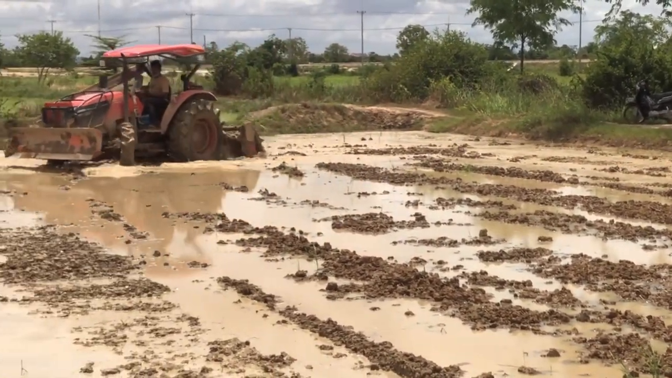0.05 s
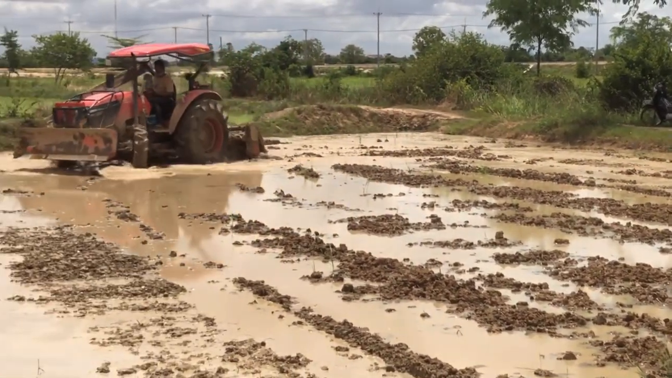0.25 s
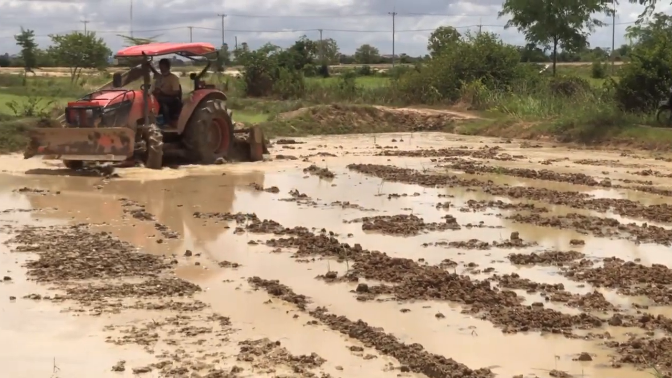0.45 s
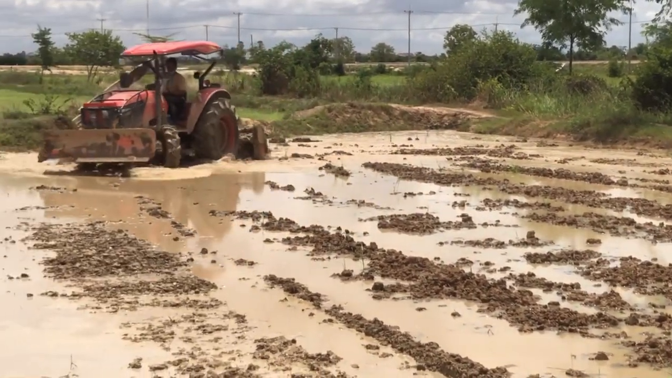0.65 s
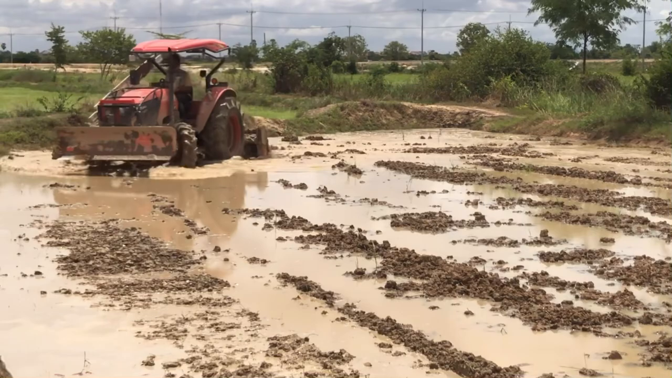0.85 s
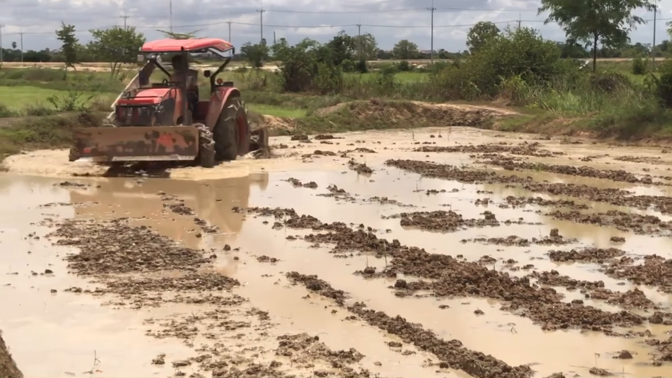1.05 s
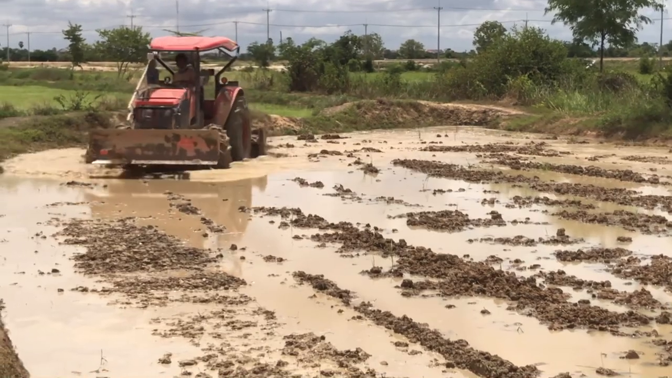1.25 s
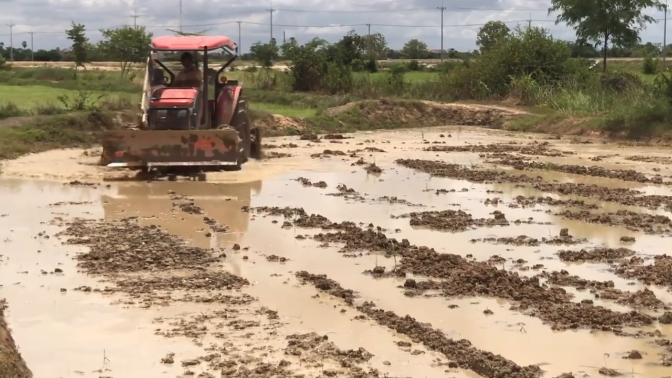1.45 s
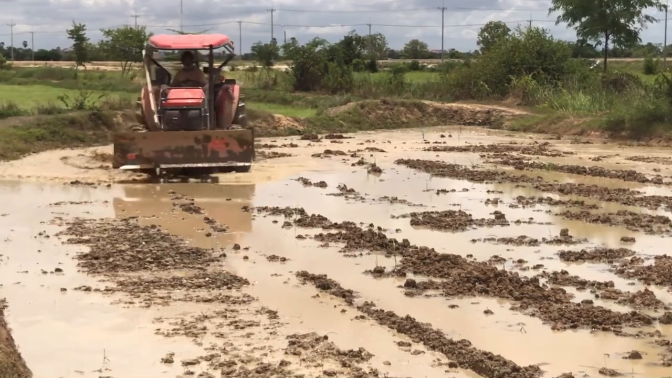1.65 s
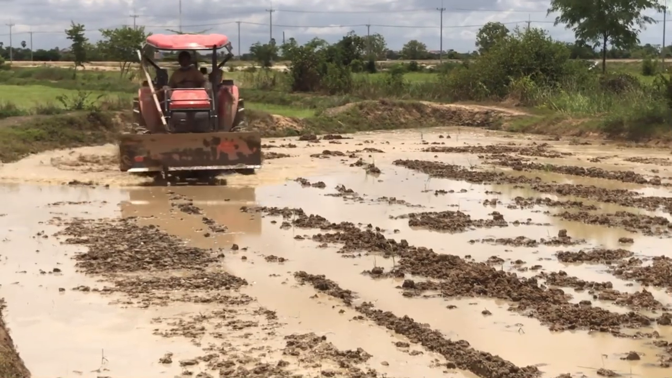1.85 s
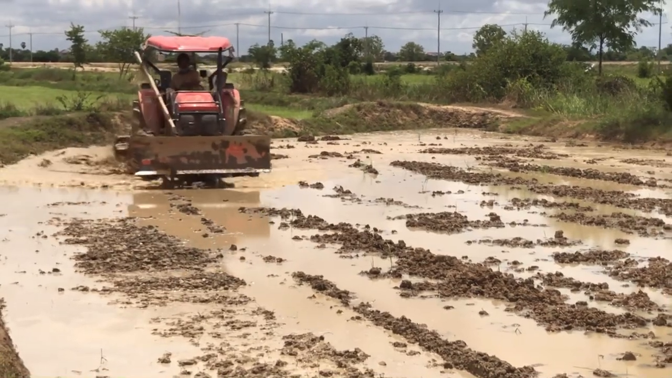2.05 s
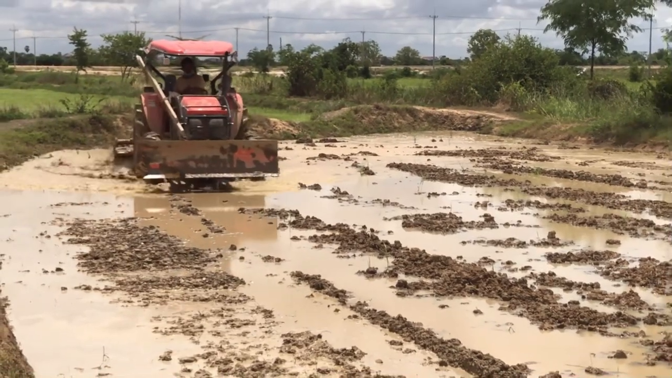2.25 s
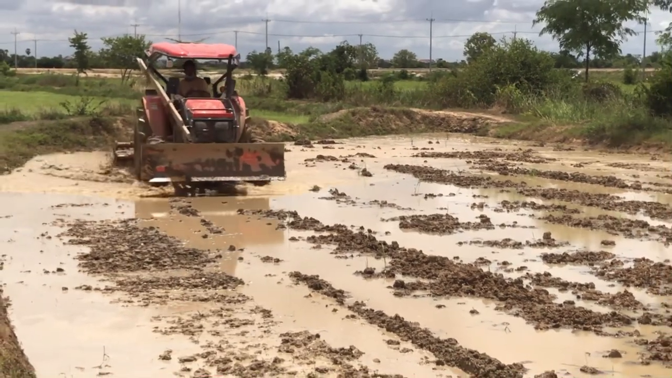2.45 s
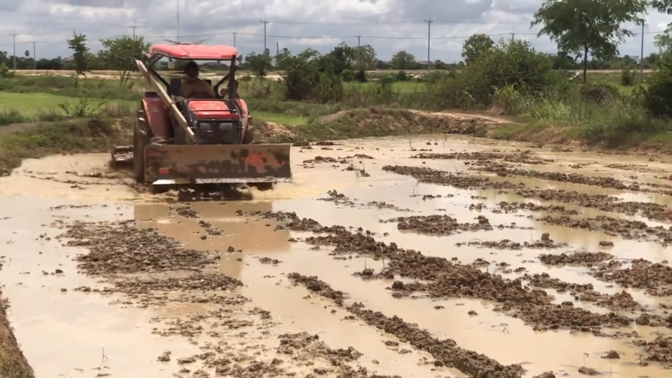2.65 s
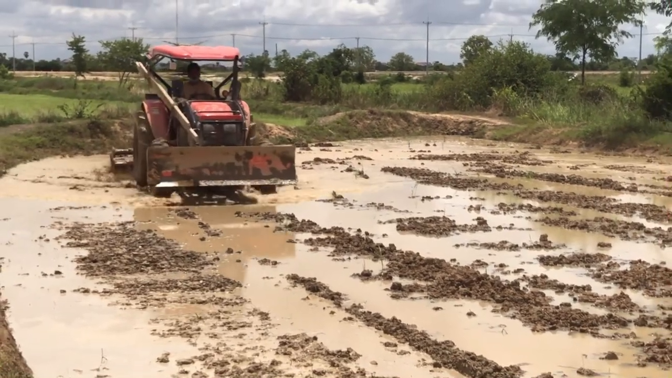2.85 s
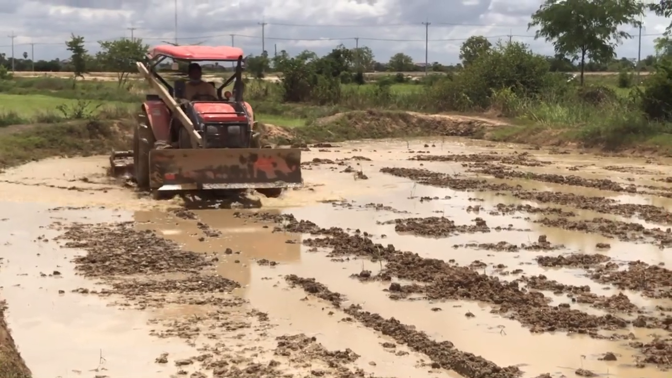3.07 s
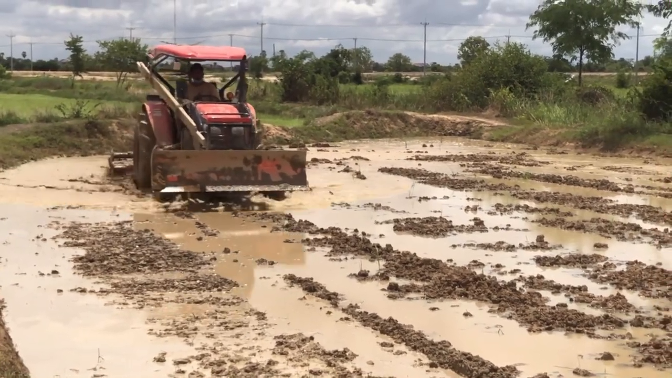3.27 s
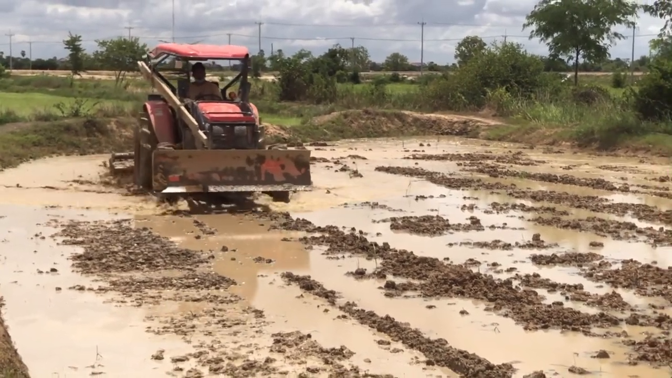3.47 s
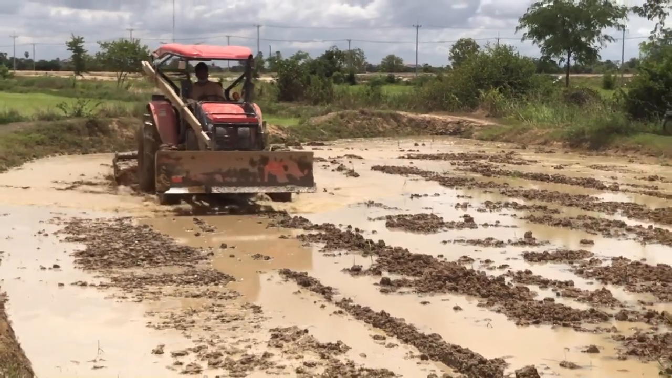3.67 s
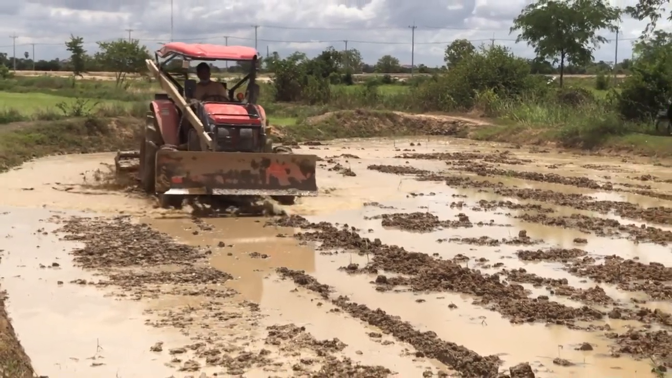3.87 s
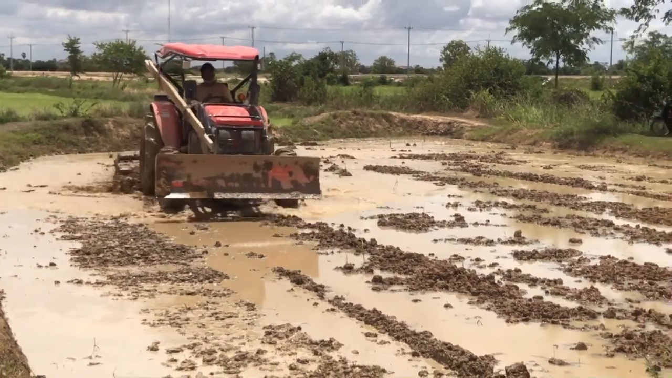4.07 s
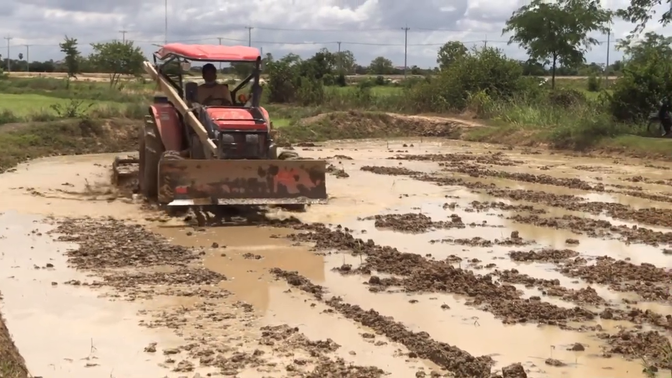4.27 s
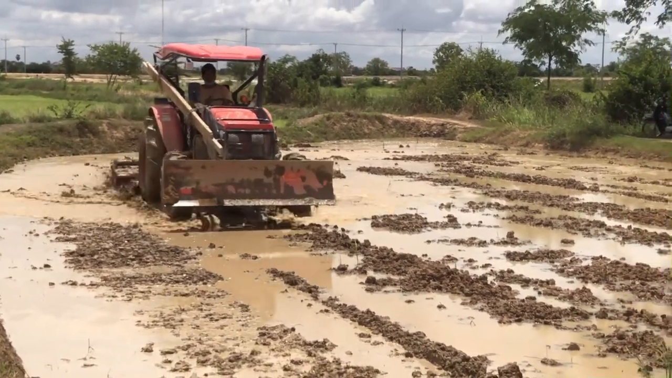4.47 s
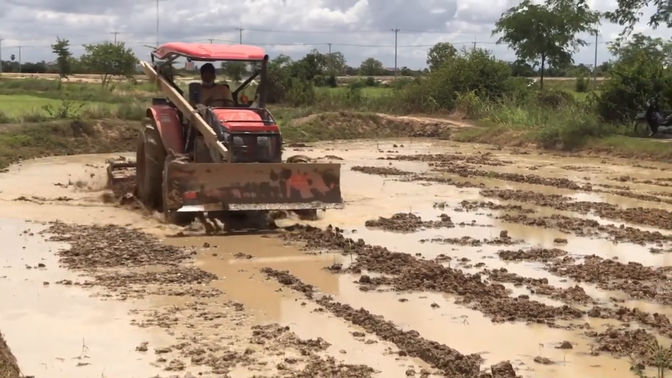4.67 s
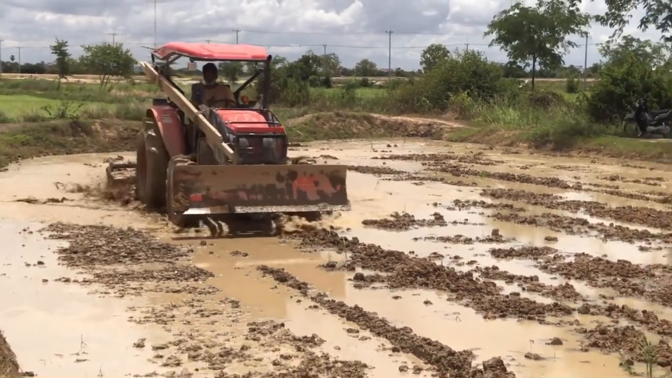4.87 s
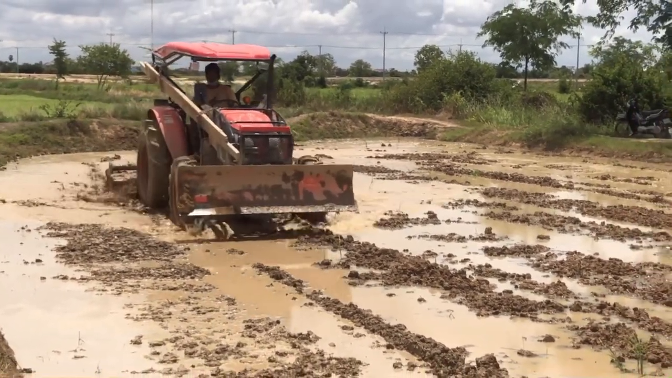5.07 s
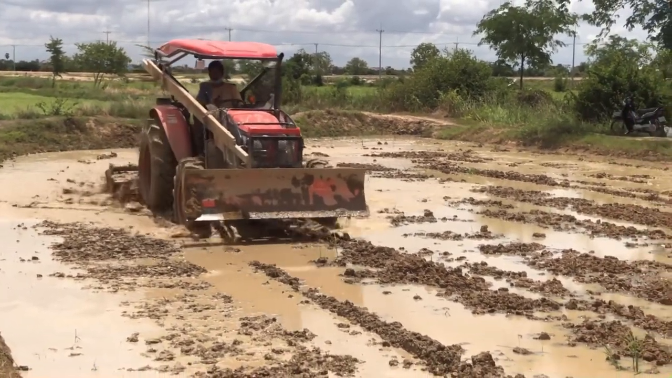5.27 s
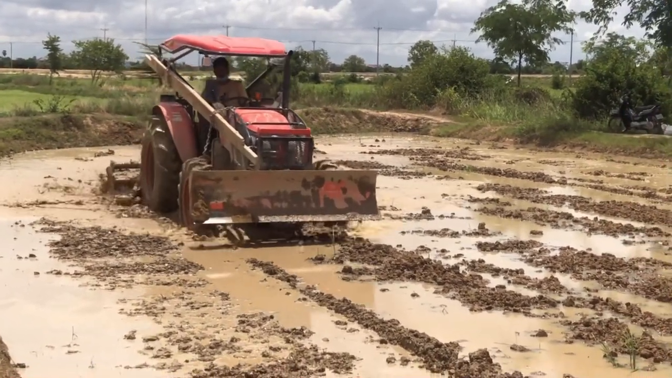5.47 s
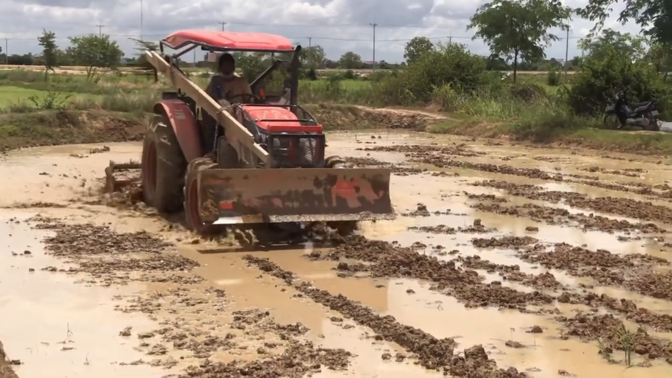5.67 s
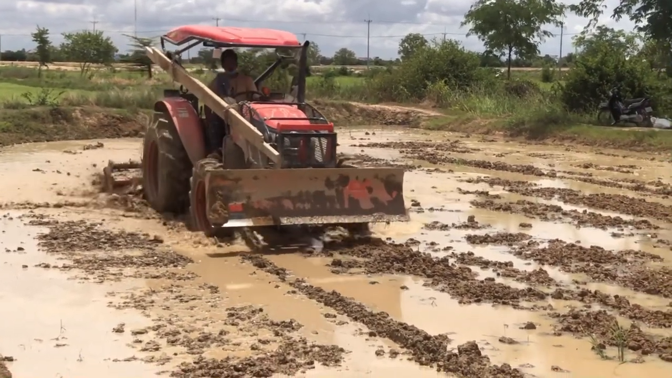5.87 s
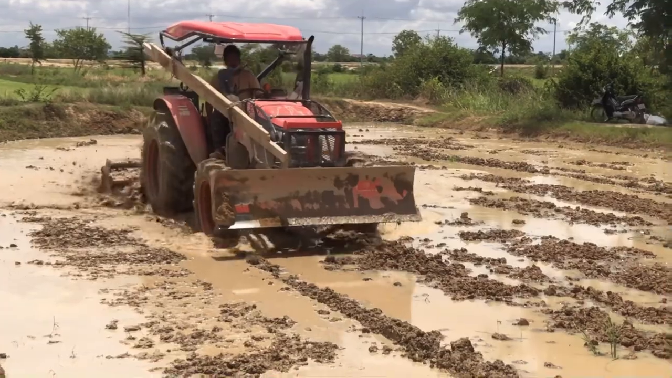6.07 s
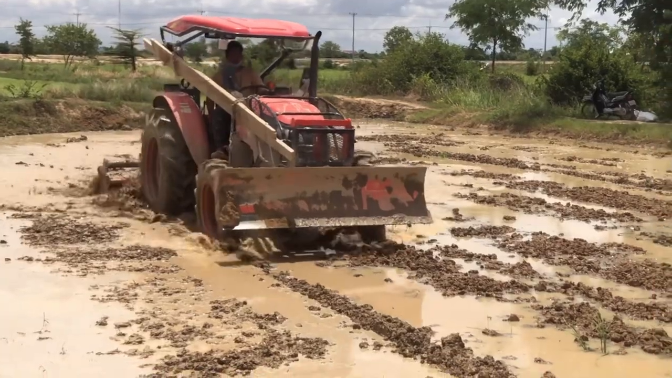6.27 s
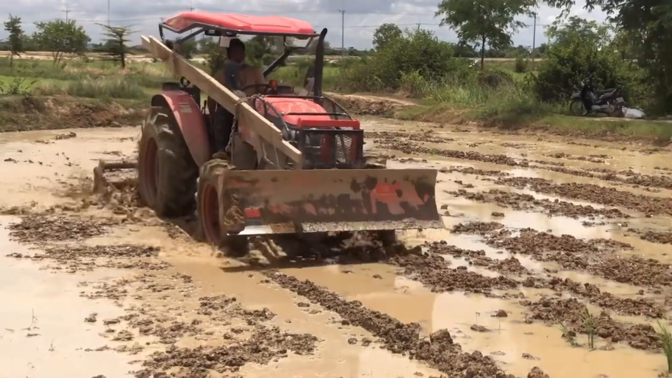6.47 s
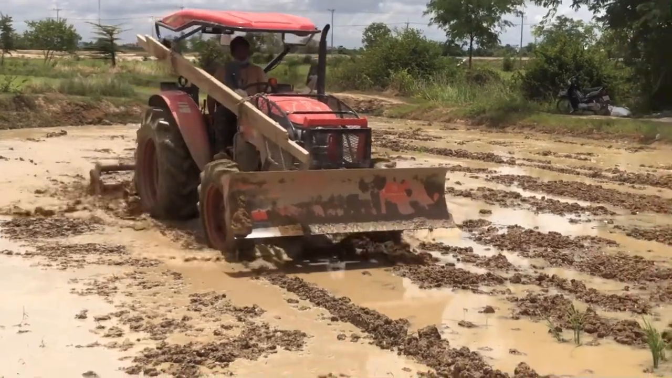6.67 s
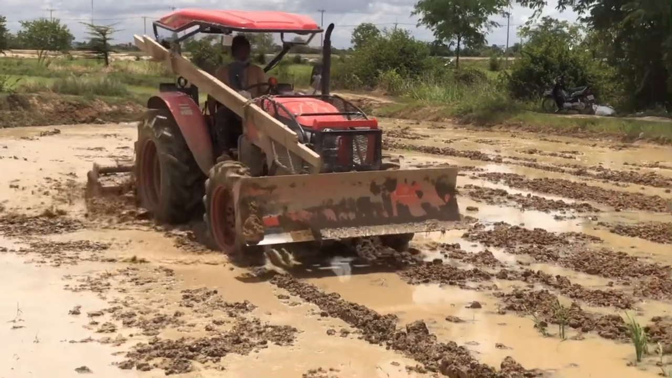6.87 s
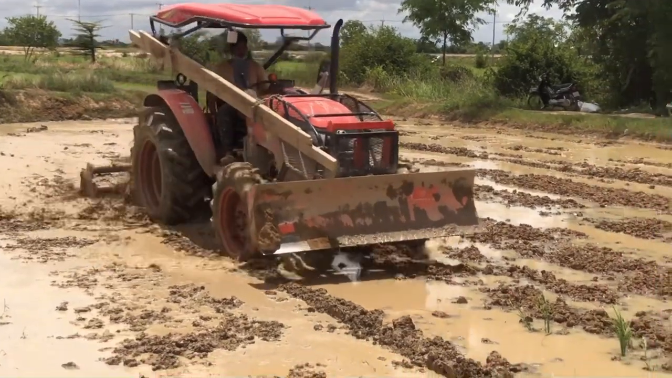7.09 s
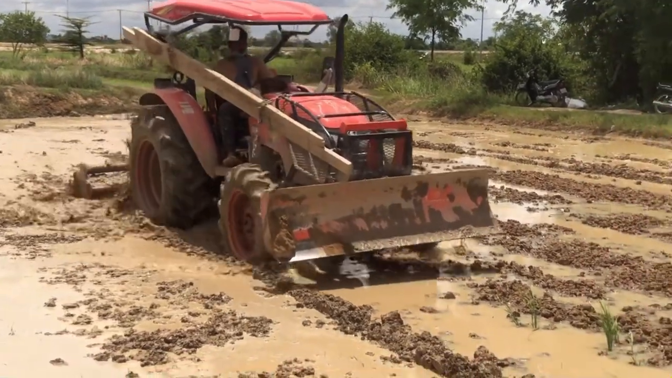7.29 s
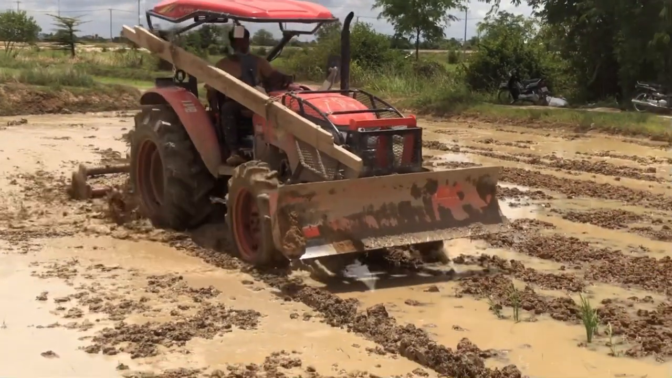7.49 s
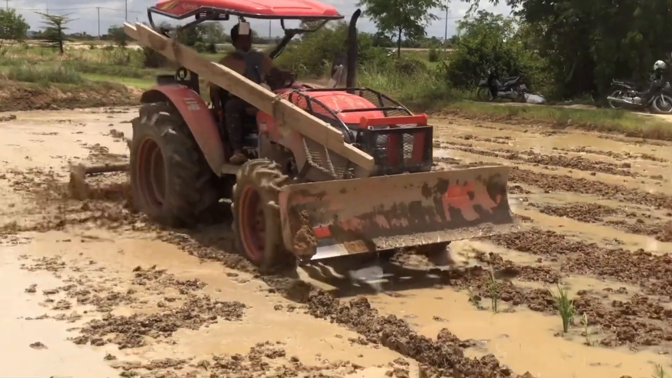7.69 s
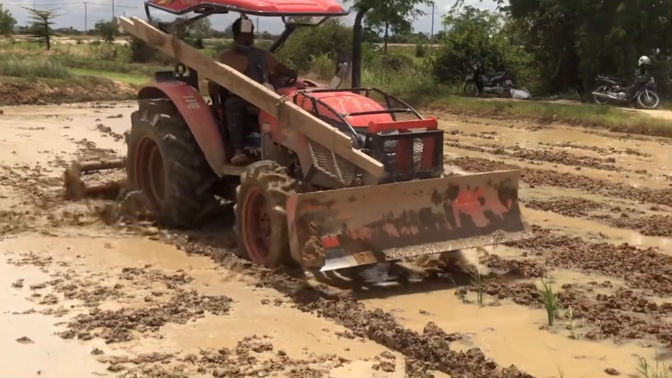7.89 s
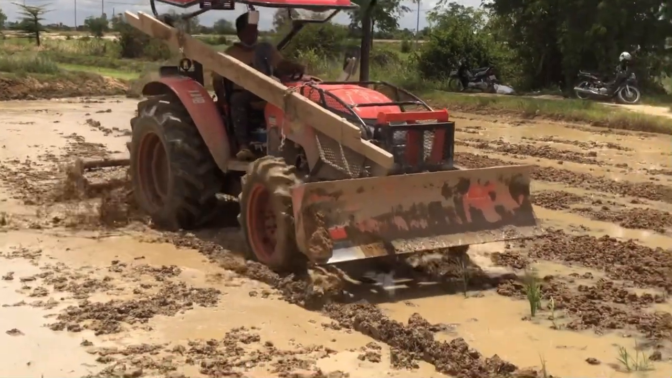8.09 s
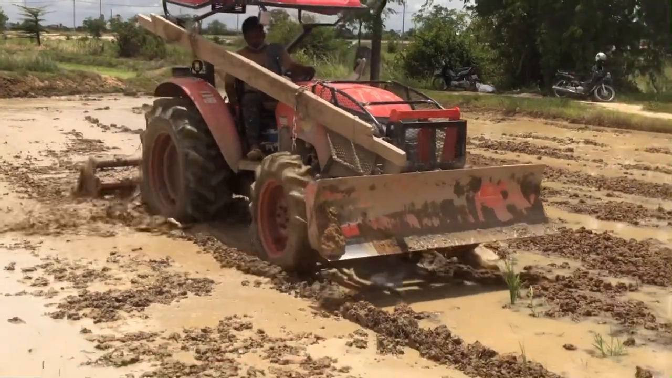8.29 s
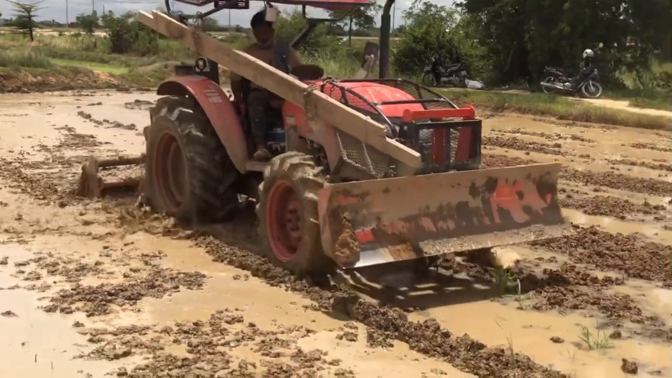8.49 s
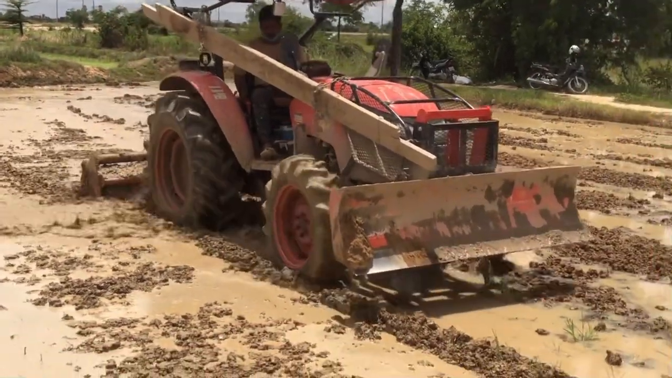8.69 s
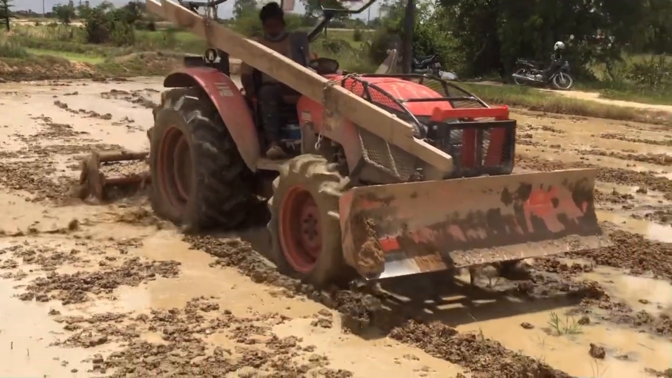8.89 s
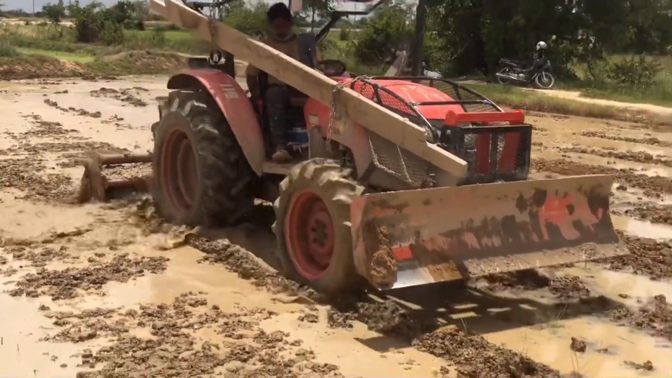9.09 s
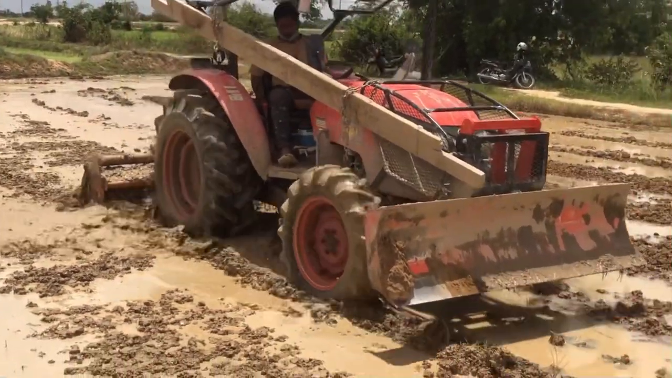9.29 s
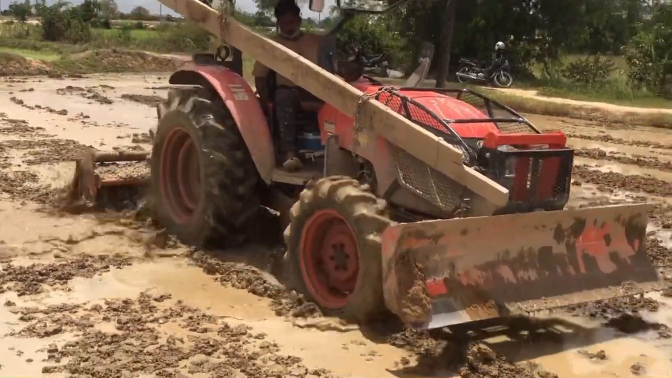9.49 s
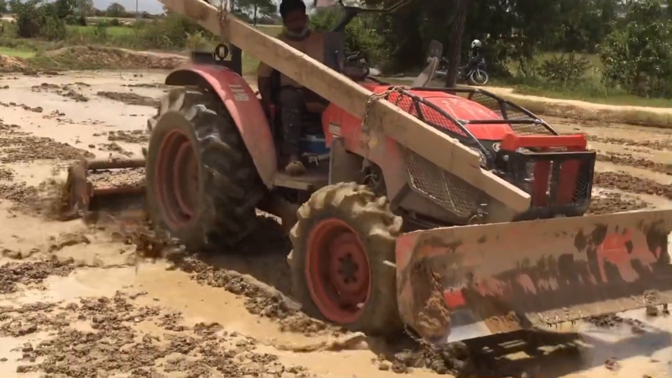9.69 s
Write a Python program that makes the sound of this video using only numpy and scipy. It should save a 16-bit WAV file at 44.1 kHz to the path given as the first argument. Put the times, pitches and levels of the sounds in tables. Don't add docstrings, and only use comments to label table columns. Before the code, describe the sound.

A four-cylinder diesel tractor is already running about fifteen metres away in an open flooded field, heard in mono. At 0 s its low exhaust drone is strong, then drops in force as the engine speeds up and the tractor turns through the first second; a small tap and wind puffs brush the microphone around 0.2-0.7 s. Load returns by 2 s. Near 2.9 s it faces the listener and injector ticks and valve clatter become brighter. From 3 to 6 s it approaches steadily, pitch dipping near 3.9 s then climbing, with water reflections sweeping hollowly through the knock and soft wind rising around 6 s. From 7 s the engine sags and labours, with faint gear whine and thickening hiss of muddy spray. A faint bright metal ping comes at 8.5 s; pitch is lowest around 8.8 s, then recovers as it ends loudest, about four metres away at 9.7 s.

```python
import sys
import numpy as np
from scipy import signal
from scipy.io import wavfile
from scipy.ndimage import uniform_filter1d

SR = 44100
rng = np.random.default_rng(int(sys.argv[2]) if len(sys.argv) > 2 else 0)


def linear_from_db(decibels):
    return 10 ** (np.asarray(decibels, float) / 20)


def pcm_store(signal):
    levels = np.round(np.clip(np.atleast_2d(signal), -1, 1) * 32767)
    wavfile.write(sys.argv[1], SR, levels.astype(np.int16).T)


N = 429534

# time in seconds, firing rate in Hz.
FIRING_RATE = [(0.0, 76.1), (0.6, 86.86), (1.14, 87.24), (1.38, 80.9), (1.62, 86), (2.09, 89.83),
               (2.85, 89.27), (3.5, 85.84), (3.88, 81.53), (5.21, 88.87), (6.4, 91.72), (7.22, 79.45),
               (7.54, 79.5), (7.84, 75.08), (8.24, 79.84), (8.82, 71.57), (9.49, 76.96), (9.74, 83.66)]
# time in seconds, distance in m.
DISTANCE = [(0, 15.2), (.7, 13.7), (1.7, 12.8), (2.6, 13), (3.2, 11.2), (3.7, 10.3), (4.2, 10), (5.7, 7.94),
            (6.2, 7.6), (6.7, 6.8), (7.2, 6.13), (8.2, 5.38), (8.7, 4.98), (9.74, 4.25)]


def read(points, hz):
    f, value = np.transpose(points)
    return np.interp(np.log(hz + 1), np.log(f + 1), value)


def curves(rows):
    s, *columns = np.transpose(rows)
    return [np.interp(np.arange(N) / SR, s, column) for column in columns]


def evened(x):
    return x / np.sqrt(np.mean(x ** 2) + 1e-20)


def coloured(x, points):
    hz = abs(np.fft.fftfreq(8192, 1 / SR))
    log_gain = np.log(linear_from_db(np.maximum(read(points, hz), -90)))
    taps = np.fft.ifft(np.exp(np.conj(signal.hilbert(log_gain)))).real[:4096]
    return evened(signal.oaconvolve(x, taps)[:N])


def ring(x, hz, width):
    r = np.exp(-np.pi * width / SR)
    return signal.lfilter([1, 0, -1], [1, -2 * r * np.cos(2 * np.pi * hz / SR), r * r], x)


def wander(per_s):
    size = max(round(SR / per_s), 1)
    return evened(uniform_filter1d(uniform_filter1d(rng.standard_normal(N), size), size))


def bell(s, rise, fall):
    t = np.arange(N) / SR
    return np.exp(-2 * ((t - s) / np.where(t < s, rise, fall)) ** 2)


def nudges(rows):
    return sum(db * bell(*shape) for *shape, db in rows)


def swells(rows, rest_db=-90):
    power = sum(linear_from_db(db) ** 2 * bell(*shape) for *shape, db in rows)
    return 10 * np.log10(linear_from_db(rest_db) ** 2 + power)


def heard(db, distance_share, effort_share, turned_db):
    # time in seconds, effort in dB.
    fuel_effort = [(0, 1), (.16, -2), (.28, -8.5), (.42, -5), (.7, -10.5), (.98, -5), (1.14, -1.5),
                   (1.96, 1), (2.2, -2.5), (2.94, 2), (3.36, -1.5), (3.52, .5), (4.3, 1), (4.65, 1),
                   (6.05, 0.5), (6.58, 0.5), (7.3, -1.5), (9.74, -2)]
    near_db = 20 * np.log10(10 / curves(DISTANCE)[0])
    turned_s, turn_length_s = 2.92, 0.095
    turned = .5 + .5 * np.tanh((np.arange(N) / SR - turned_s) / turn_length_s)
    return db + distance_share * near_db + effort_share * curves(fuel_effort)[0] + turned_db * turned


def jolts_db(layer):
    # time, rise and fall in seconds, change in dB.
    ridges = [(.6, .2, .2, -1.5), (1.0, .2, 0.2, 2.5), (2.3, 0.63, 0.13, -0.5), (2.68, 0.19, 0.13, 2.5),
              (3.3, .2, 0.28, 0.5), (4.4, 0.33, 0.36, 0.5), (5.75, 0.14, 0.26, -1), (6.3, 0.27, 0.14, 0.5),
              (6.7, .15, 0.12, 1), (8.76, 0.9, 0.31, -1), (9.74, .15, .2, 1)]
    layer_shares = (0.1, 1.1, 3.8, 1.3)
    return layer_shares[layer] * nudges(ridges)


def mirrored(x, share, top_hz, height=1):
    # time in seconds, strength 0-1.
    open_water = [(0, .3), (1, .35), (2.6, .4), (3.4, .65), (4.7, .65), (6.2, .5), (8, .6), (9.74, .4)]
    delay_ms = 1.0 * 10 / curves(DISTANCE)[0]
    strength = share * curves(open_water)[0]
    wide = signal.resample_poly(x, 3, 1, window=signal.firwin(91, top_hz, fs=3 * SR))
    echo = np.interp(3 * (np.arange(N) - height * delay_ms * SR / 1000), np.arange(len(wide)), wide)
    return (x + strength * echo) / np.sqrt(1 + strength ** 2)


def firings():
    return np.cumsum(curves(FIRING_RATE)[0]) / SR


def burst(turns, depth, decay, spread_db):
    cylinder_levels = [1, 0.1, -0.5, -2.5]
    index, part = np.divmod(turns - 0.17 + 1, 1)
    index = index.astype(int)
    chance = np.clip(rng.standard_normal(index.max() + 1), -1.6, 1.6)
    size_db = np.take(cylinder_levels, index % 4) + spread_db * chance[index]
    puff = linear_from_db(size_db) * part / decay * np.exp(-part / decay) * (1 - part ** 4)
    return 1 - depth + depth * evened(puff)


def shaking(turns, repeat):
    cycle = rng.standard_normal(256)
    same = np.interp(turns / 4 % 1 * 256, np.arange(257), np.append(cycle, cycle[0]))
    return repeat * evened(same) + rng.standard_normal(N)


def clicks(turns, spread_db):
    at = np.flatnonzero(np.diff(np.floor(turns - .22)))
    chance = rng.standard_normal((len(at), 2))
    at = np.clip(at + np.round(3.0 * chance[:, 0]).astype(int), 0, N - 1)
    out = np.zeros(N)
    out[at] = linear_from_db(spread_db * np.clip(chance[:, 1], -2, 2))
    return evened(out)


def wind():
    # time, rise and fall in seconds, level in dB.
    gusts = [(.24, 0.055, 0.13, -44), (.47, .08, 0.12, -45), (.68, 0.15, 0.15, -45),
             (3.45, 0.076, 0.92, -45.5), (4.8, 0.66, 0.79, -50), (6, 0.41, 0.76, -39.5),
             (6.9, 0.32, 1.26, -43)]
    # frequency in Hz, density in dB per Hz.
    wind_colour = [(20, -66), (50, -13), (120, -6.5), (250, -9.5), (500, -23.5), (1200, -47)]
    level_db = swells(gusts, -46.5) + 2.35 * wander(22)
    return linear_from_db(level_db) * coloured(rng.standard_normal(N), wind_colour)


def knocks():
    # time in seconds, peak in dB, ring in Hz, width in Hz.
    taps_and_ping = [
        (.248, -32, 2400, 1500),
        (.24, -29, 150, 50),
        (8.475, -37, 13000, 130),
    ]
    out = np.zeros(N)
    for s, db, hz, width in taps_and_ping:
        puff = rng.standard_normal(4000) * np.exp(-np.arange(4000) / 35)
        tap = ring(ring(puff, hz, width), hz, 2 * width)
        out[round(s * SR):][:len(tap)] += linear_from_db(db) * tap / abs(tap).max()
    return out


def spray():
    # frequency in Hz, density in dB per Hz.
    hiss_colour = [(2000, -7), (5000, 0.5), (6400, -3.5), (9000, 0.5), (12000, 1.5), (15700, -0.5)]
    spray_law = (-65.5, 1.77, -0.1, 0)
    drop_size = linear_from_db(6.0 * np.minimum(rng.exponential(1, N), 4))
    drops = drop_size * (rng.random(N) < 150 / SR)
    flicker = 1 + .3 * evened(signal.lfilter([1], [1, -.98], drops))
    level_db = heard(*spray_law) + jolts_db(3) + 6.5 + 1.0 * wander(4.3)
    return linear_from_db(level_db) * coloured(rng.standard_normal(N) * flicker, hiss_colour)


def gears(turns):
    mesh_law = (-63, 1.3, .6, -.5)
    # time, rise and fall in seconds, level in dB.
    mesh_swells = [(0, .1, .18, -40), (.3, .15, .15, -50), (7.2, .5, .4, -54)]
    second_mesh_swells = [(7.2, 0.48, 0.49, -43.5), (8.8, 1.4, 1.61, -45)]
    pump_swells = [(2.5, 1.6, 1.65, -49), (9, 5.2, 1.52, -80)]
    mesh_db = swells(mesh_swells, heard(*mesh_law) + 6.7 * wander(9.1))
    whines = [(mesh_db, 13.5), (swells(second_mesh_swells), 12.7), (swells(pump_swells), 4.75)]
    out = 0
    for db, multiple in whines:
        out += linear_from_db(db + 1.5 * wander(15)) * np.cos(2 * np.pi * multiple * turns + .6 * wander(12))
    return np.sqrt(2) * out


def injector_ticks(turns):
    # ring in Hz, width in Hz, level in dB.
    injector_pipes = [(5930, 110, -9), (7080, 41, -3), (7780, 95, -17), (7630, 180, 3.5),
                      (7650, 380, -13.5), (8280, 97, -1), (9130, 130, -4.5), (10010, 67, -5.5),
                      (10870, 210, -35), (10800, 540, 6), (11860, 200, -11), (13100, 820, -3)]
    tick_law = (-59, 1, -0.3, 7)
    rattle = burst(turns, .72, .15, 3.0)
    ticks = 0
    for hz, width, db in injector_pipes:
        strike = rng.standard_normal(N) * rattle + .6 * clicks(turns, 4.0)
        ticks += linear_from_db(db + 1.6 * wander(4)) * evened(ring(strike, hz, 1.1 * width))
    return linear_from_db(heard(*tick_law) + jolts_db(2) - 5.5) * mirrored(evened(ticks), .8, 12000)


def valve_clatter(turns):
    # frequency in Hz, density in dB per Hz.
    clatter_colour = [(1200, -45), (1800, -9), (2310, -9), (2560, -15), (2850, -7.5), (3000, -2),
                      (3250, -4.5), (3700, -8), (4140, 3.5), (4670, -4), (5150, -11), (6400, -20.5),
                      (9000, -51), (15700, -62)]
    # ring in Hz, width in Hz, level in dB.
    rocker_rings = [(2326, 15, -14), (3055, 25, -15.5), (4095, 38, -15.5), (4654, 50, -6.5)]
    clatter_law = (-54, 0.63, 0.13, 2.5)
    valves = rng.standard_normal(N) * burst(turns, .34, .18, 1.8) + .28 * clicks(turns, 3.0)
    clatter = coloured(valves * linear_from_db(0.9 * wander(5.9)), clatter_colour)
    rockers = rng.standard_normal(N) * burst(turns, .5, .18, 2.0)
    for hz, width, db in rocker_rings:
        clatter += linear_from_db(db + 2.0 * wander(5.1)) * evened(ring(rockers, hz, 1.9 * width))
    return linear_from_db(heard(*clatter_law) + jolts_db(1)) * mirrored(clatter, .9, 6500, 0.96)


def rumble(turns):
    # frequency in Hz, density in dB per Hz.
    rumble_colour = [(25, -54), (50, -23), (110, -10.5), (200, -6), (270, -6), (350, -8), (420, -6.5),
                     (545, -10), (615, -17), (700, -22.5), (1000, -52)]
    rumble_law = (-41, 1.1, 0.14, -2)
    heaving = shaking(turns, .24) * burst(turns, .3, .25, 1.5)
    return linear_from_db(heard(*rumble_law) + 2) * coloured(heaving, rumble_colour)


def side_cover(turns, knock):
    cover_law = (-5.5, .5, 0.16, .3)
    struck = knock * burst(turns, 0.21, .2, 4.9)
    return linear_from_db(heard(*cover_law) + 1.3 * wander(18)) * evened(ring(ring(struck, 1463, 173), 1395, 280))


def block_knock(turns):
    # frequency in Hz, density in dB per Hz.
    block_colour = [(450, -31), (615, -27.5), (690, -2.5), (800, -1.5), (1070, 2.5), (1300, 2.5),
                    (1490, -6), (1600, -25.5), (1760, -16.5), (2000, -15), (2600, -40)]
    # ring in Hz, width in Hz, level in dB.
    bonnet_panels = [(780, 70, -12), (1088, 35, -10), (1225, 35, -12)]
    block_law = (-41.5, 0.79, 0.19, 1)
    blows = burst(turns, .38, .2, 1.2)
    knock = shaking(turns, .2) * blows
    block = coloured(shaking(turns, .2) * blows, block_colour)
    for hz, width, db in bonnet_panels:
        block += linear_from_db(db + 2.9 * wander(0.63)) * evened(ring(knock, hz, width))
    height = 1.03
    both = mirrored(block, .4, 6500, height) + mirrored(side_cover(turns, knock), 1.4, 6500, height)
    return linear_from_db(heard(*block_law) + jolts_db(0)) * both


def exhaust(turns):
    # frequency in Hz, dB re the tone.
    second_gain = [(144, 1.5), (158, 4), (168, 5), (174, 3.5), (179, 1.5), (184, -3.5)]
    third_gain = [(216, -3), (238, -5.5), (250, -12), (280, -13.5)]
    # time, rise and fall in seconds, dB on the second multiple.
    coasting = [(.85, 0.35, 0.44, -5.5), (6.0, 0.38, 0.51, -4), (9.5, 0.26, 0.56, -3.5)]
    # time, rise and fall in seconds, change in dB.
    cab_shade = [(4.2, 1.19, .9, -11), (6.1, 0.79, .8, -8), (8.3, 0.12, 0.18, -5), (9.74, 0.16, .2, 2)]
    # time in seconds, lag of second and third in rad.
    pipe_lag = [(0, 1.9, -1.4), (6, 1.6, -2.2), (7.4, 2.4, 1.3), (9.74, 2.7, 1.2)]
    hz = curves(FIRING_RATE)[0]
    tone_db = heard(-35, 1, 0.99, 0)
    second_db = read(second_gain, 2 * hz) + nudges(coasting)
    third_db = read(third_gain, 3 * hz) + nudges(cab_shade)
    second_lag, third_lag = curves(pipe_lag)
    angle = 2 * np.pi * turns
    out = linear_from_db(.3 * wander(20)) * np.cos(angle)
    out += linear_from_db(second_db + .4 * wander(30)) * np.cos(2 * angle - second_lag)
    out += linear_from_db(third_db + 2.5 * wander(20)) * np.cos(3 * angle - third_lag)
    out += linear_from_db(third_db - 12) * np.cos(4 * angle - 2 * second_lag + 3)
    return np.sqrt(2) * linear_from_db(tone_db) * out


def scene():
    turns = firings()
    engine = rumble(turns) + block_knock(turns) + valve_clatter(turns) + injector_ticks(turns)
    mix = exhaust(turns) + engine + gears(turns) + spray() + wind() + knocks()
    return mix[None]


def band_limit(x):
    return signal.sosfilt(signal.butter(12, 15710, fs=SR, output="sos"), x)


def record(dry):
    return band_limit(dry)


dry = scene()
out = record(dry)
pcm_store(out)
```